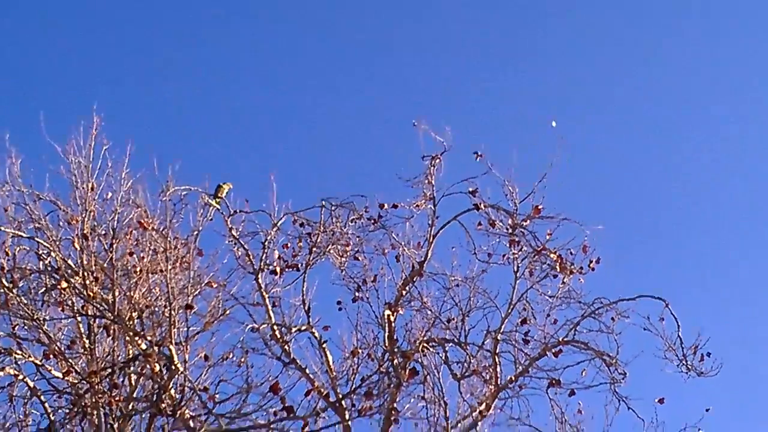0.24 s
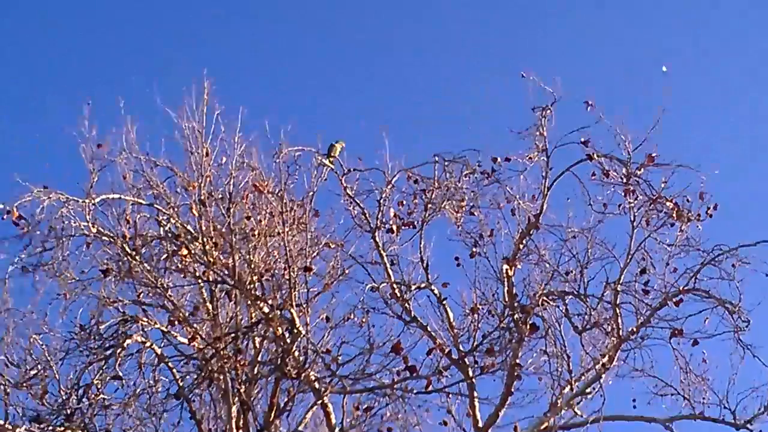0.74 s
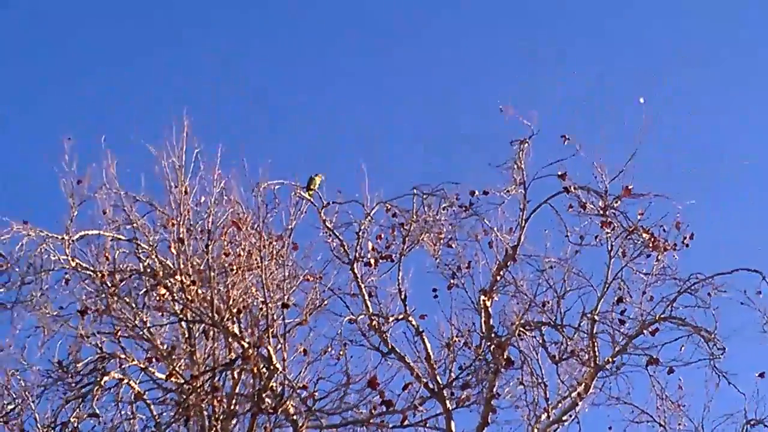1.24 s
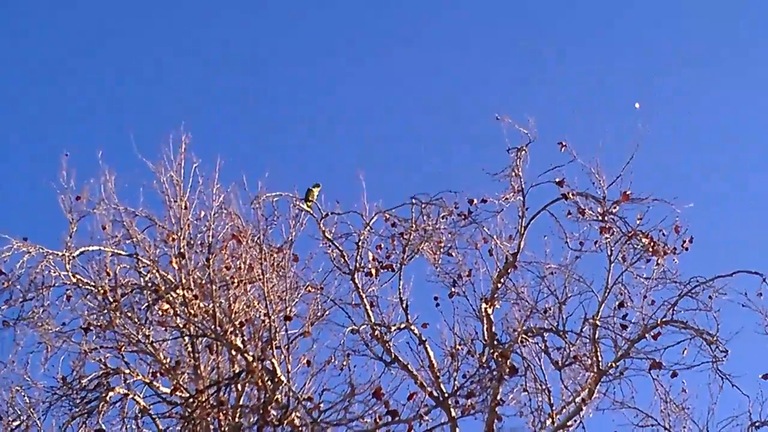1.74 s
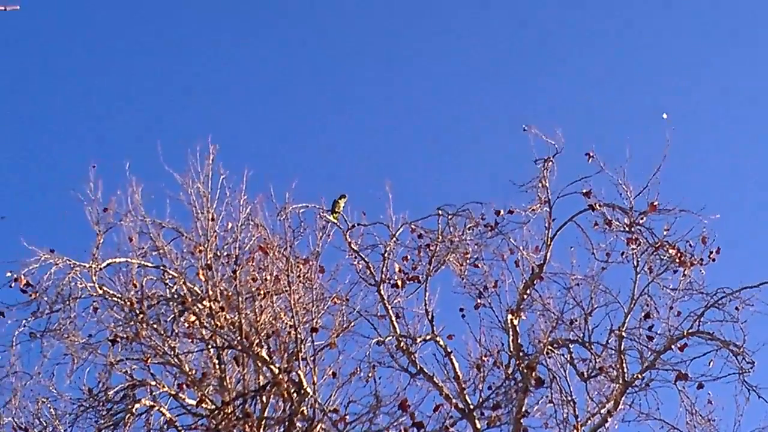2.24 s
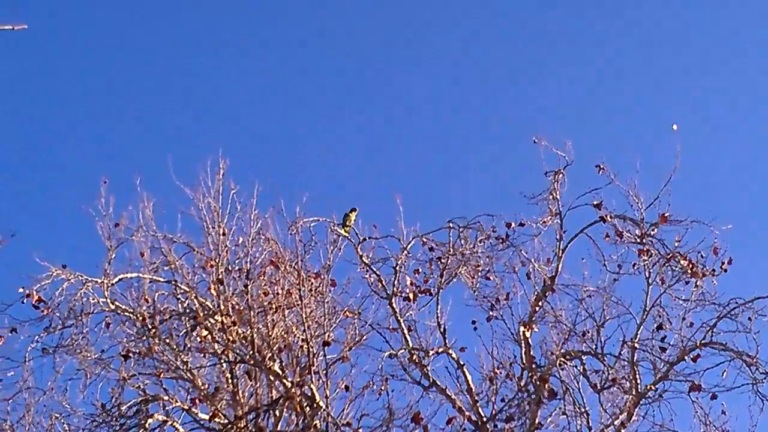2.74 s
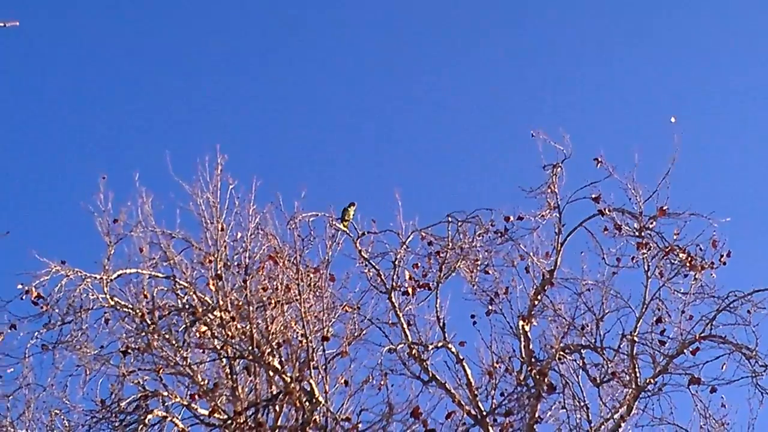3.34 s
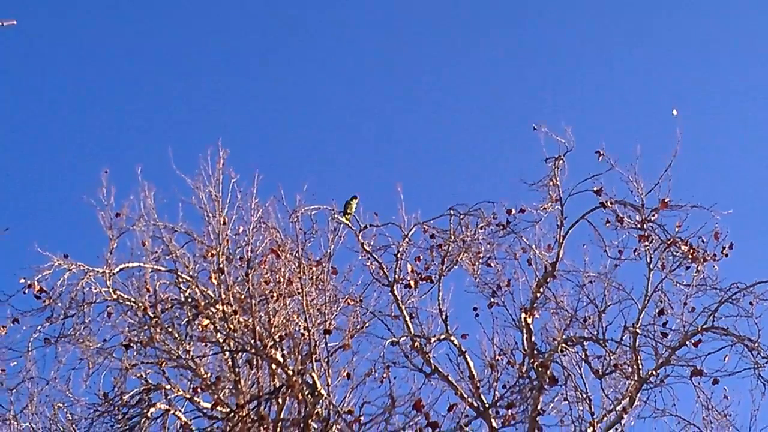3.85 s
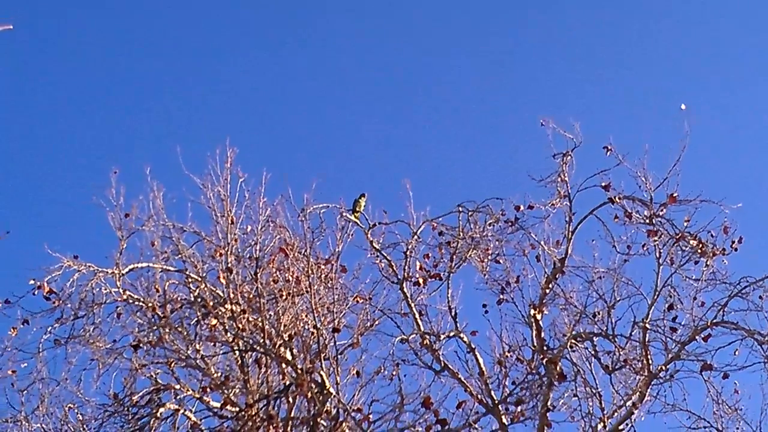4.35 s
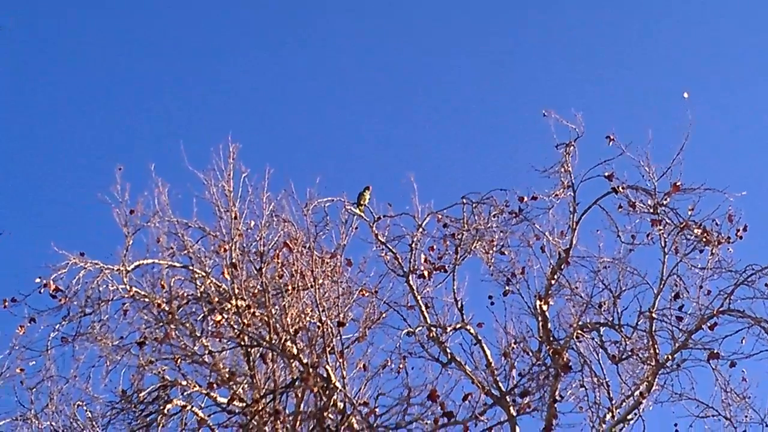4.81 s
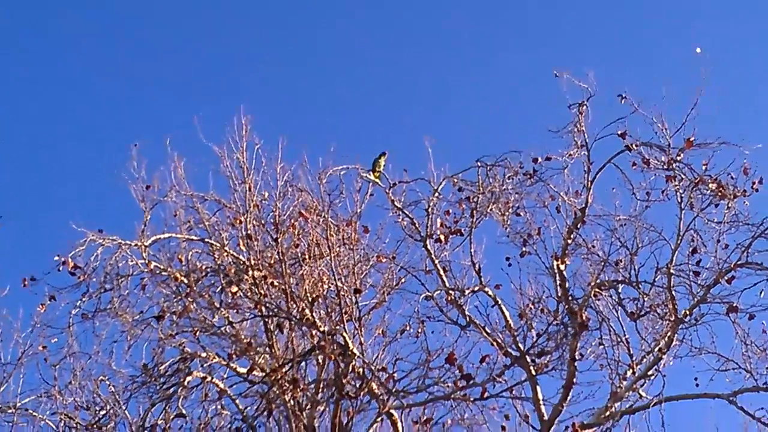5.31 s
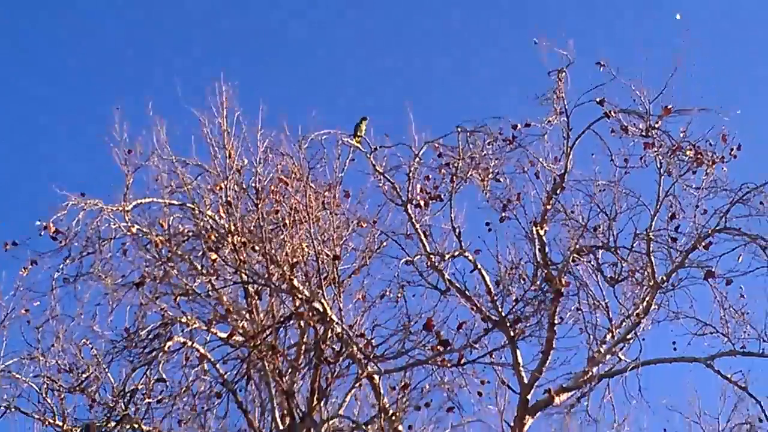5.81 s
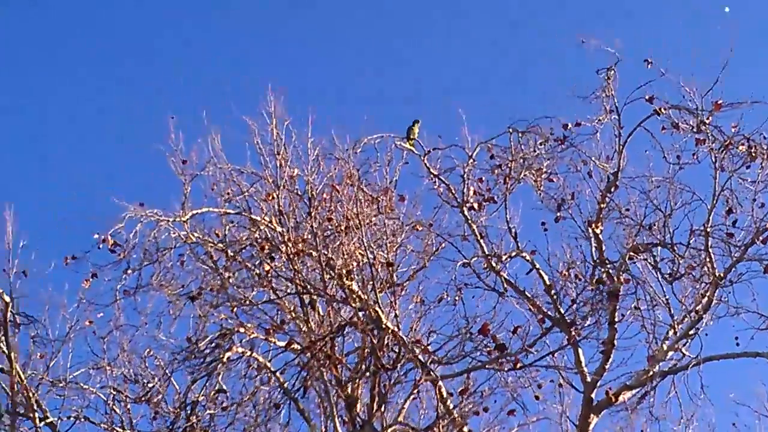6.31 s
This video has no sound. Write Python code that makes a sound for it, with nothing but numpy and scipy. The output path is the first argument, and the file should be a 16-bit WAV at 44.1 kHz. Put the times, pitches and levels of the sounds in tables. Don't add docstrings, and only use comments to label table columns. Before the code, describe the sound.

A close parrot yodels and later squawks roughly from a bare tree while sparrows chirp and warble and other parrots rasp and screech further off.

```python
import sys
import numpy as np
from scipy import signal
from scipy.io import wavfile
from scipy.ndimage import uniform_filter1d

SR = 44100
rng = np.random.default_rng(int(sys.argv[2]) if len(sys.argv) > 2 else 0)


def dump(signal):
    limited = np.clip(np.atleast_2d(signal).T, -1, 1)
    pcm = np.round(limited * 32767).astype(np.int16)
    wavfile.write(sys.argv[1], SR, pcm)


def gain_from_decibels(decibels):
    exponent = np.asarray(decibels, float) / 20
    return 10 ** exponent


N = 289737

LEAP = 1.4
NEAR_BURR = 0.42


def in_db(points, hz):
    corner_hz, level = np.array(points).T
    return np.interp(np.log(hz), np.log(corner_hz), level)


def rms_one(x):
    return x / np.sqrt(np.mean(np.abs(x) ** 2) + 1e-20)


def wobble(count, hz):
    white = rng.standard_normal(count + 200) + 1j * rng.standard_normal(count + 200)
    lowpass = signal.butter(2, min(hz, 9000), fs=SR, output="sos")
    return rms_one(signal.sosfilt(lowpass, white)[200:])


def slow_wobble(hz):
    return np.repeat(wobble(N // 64 + 1, 64 * hz).real, 64)[:N]


def add(track, start, sound):
    at = round(start * SR)
    track[at:at + len(sound)] += sound[:N - at]


def gate(birds):
    shut_db, lift_db = -60, 9
    open_from_db, open_full_db, duck_from_db = -60, -38, -23
    sense_s, lag_s = 0.033, 0.029
    power = uniform_filter1d(birds.mean(axis=0) ** 2, round(sense_s * SR))
    call_db = 10 * np.log10(np.abs(power) + 1e-12)
    call_db = np.interp(np.arange(N) - lag_s * SR, np.arange(N), call_db)
    opening = np.clip((call_db - open_from_db) / (open_full_db - open_from_db), 0, 1)
    duck_db = np.maximum(call_db - duck_from_db, 0)
    return shut_db + lift_db * opening - duck_db + slow_wobble(8.3)


def background(gate_db):
    # frequency in Hz, level in dB per Hz.
    air = [(21, -58), (35, -13), (69, -1.5), (128, -7), (156, -12.5), (343, -19), (420, -28), (555, -7),
           (614, -18), (734, -23), (1280, -27.5), (1460, -27.5), (3040, -24.5), (3910, -29.5), (15000, -41)]
    # frequency in Hz, left-right likeness from -1 to 1.
    likeness = [(60, 0.95), (180, 0.92), (550, 0.38), (1650, 0.0062), (4970, -0.17), (15000, -0.15)]
    white = rng.standard_normal((2, 2, N))
    edges = 24 * 2 ** np.arange(0, 9.6, .5)
    out = 0
    for k, (low, high) in enumerate(zip(edges, edges[1:])):
        bandpass = signal.butter(2, [low, high], "band", fs=SR, output="sos")
        mid, side = signal.sosfilt(bandpass, white[k % 2])
        hz = np.sqrt(low * high)
        alike = np.clip(in_db(likeness, hz), -1, 1)
        stereo = np.sqrt(1 + alike) * mid + np.sqrt(1 - alike) * side * [[1], [-1]]
        out = out + gain_from_decibels(in_db(air, hz) + 4.5 * slow_wobble(10.15625)) * stereo
    return gain_from_decibels(gate_db + 3.0) * rms_one(out)


def rustles():
    # start in seconds, length in seconds, level in dB.
    puffs = [
        (3.185, .04, -55),
        (3.74, .09, -58),
        (4.3, .16, -64),
        (4.66, .075, -60),
    ]
    out = np.zeros(N)
    for start, length, level_db in puffs:
        count = round(length * SR)
        add(out, start, gain_from_decibels(level_db) * rng.standard_normal(count) * np.hanning(count) ** 0.34)
    return signal.sosfilt(signal.butter(2, 7500, "high", fs=SR, output="sos"), out)


def twigs():
    # time in seconds, peak level in dB.
    ticks = [(0.1, -31), (1.296, -44), (3.79, -40), (3.976, -56), (4.649, -38), (3.371, -67.5),
             (4.112, -59.5)]
    out = np.zeros(N)
    decay = np.exp(-np.arange(150) / 20.0)
    for at, peak_db in ticks:
        add(out, at, gain_from_decibels(peak_db) * rng.standard_normal(150) * decay)
    return signal.sosfilt(signal.butter(2, [5500, 14000], "band", fs=SR, output="sos"), out)


def dove():
    # start in seconds, end in seconds, pitch in Hz, level in dB.
    coos = [
        (.85, 1.12, 535, -73),
        (1.55, 2.2, 540, -72),
        (5.98, 6.1, 560, -72),
        (6.33, 6.5, 540, -72),
    ]
    out = np.zeros(N)
    for start, end, hz, level_db in coos:
        count = round((end - start) * SR)
        waver = 1 + .8 * wobble(count, 25)
        tone = (waver * np.exp(2j * np.pi * hz * np.arange(count) / SR)).real
        add(out, start, gain_from_decibels(level_db + 3) * np.hanning(count) ** 0.054 * tone)
    return out


def whistle(pitch, envelope, burr):
    jagged = pitch * (1 + .012 * wobble(len(pitch), 52).real)
    phase = 2 * np.pi * np.cumsum(jagged) / SR
    buzz = 1 + burr * wobble(len(pitch), 310)
    tone = (buzz * np.exp(1j * phase)).real
    octave = (buzz * buzz * np.exp(2j * phase)).real
    return envelope * (tone + gain_from_decibels(-33) * octave)


def arches(notes, burr, swell):
    out = np.zeros(N)
    for start, length, from_hz, top_hz, to_hz, peak_db in notes:
        u = np.linspace(-1, 1, max(round(length * SR), 64))
        foot_hz = np.where(u < 0, from_hz, to_hz)
        pitch = top_hz - (top_hz - foot_hz) * np.abs(u) ** 3
        add(out, start, gain_from_decibels(peak_db + 4.5) * whistle(pitch, (1 - u * u) ** swell, burr))
    return out


def far_chirps():
    # start in seconds, length in seconds, top pitch in Hz, peak level in dB.
    chirps = [(0.268, 0.047, 4790, -57), (0.3, 0.055, 4810, -61), (0.352, 0.036, 4030, -62.5),
              (0.913, 0.075, 5070, -71), (0.985, 0.078, 4640, -70.5), (2.717, 0.079, 4930, -64.5),
              (2.781, 0.036, 5180, -56.5), (2.81, 0.04, 4800, -60.5), (3.428, 0.034, 5040, -60.5),
              (3.508, 0.066, 4820, -67), (4.272, 0.034, 5240, -56), (4.294, 0.012, 4380, -60.5),
              (4.319, .008, 4900, -60), (4.392, 0.013, 4300, -59), (4.337, 0.024, 5010, -53.5),
              (4.357, 0.05, 5020, -55), (4.458, 0.025, 4760, -65), (5.841, 0.042, 4690, -64.5),
              (5.878, 0.034, 4770, -63), (5.886, 0.062, 3640, -69.5), (5.934, 0.017, 3970, -63.5),
              (6.036, 0.029, 3300, -69), (6.116, 0.04, 3470, -74), (6.15, 0.028, 5100, -80),
              (6.287, 0.017, 4160, -84), (5.992, 0.022, 4740, -58), (6.015, 0.043, 4155, -54.5),
              (6.198, 0.031, 5170, -72), (6.253, 0.017, 4680, -73.5), (6.395, 0.051, 5110, -64),
              (6.538, 0.089, 5100, -60)]
    rise, drop = 0.043, 0.087
    notes = [(s, length, top * (1 - rise), top, top * (1 - drop), db) for s, length, top, db in chirps]
    return arches(notes, burr=.9, swell=1.1)


def falls():
    # start in seconds, length in seconds, start pitch in Hz, peak level in dB, pick-up level in dB.
    glides = [(0.072, 0.058, 4730, -50, -44.5), (1.204, 0.058, 4620, -48.5, -40.5),
              (2.344, .066, 4680, -50, -49.5), (3.375, .051, 4605, -47, -42),
              (4.116, 0.056, 4470, -50.5, -49.5)]
    out = np.zeros(N)
    for start, length, from_hz, peak_db, pickup_db in glides:
        u = np.linspace(0, 1, round(length * SR))
        envelope = np.minimum(u / 0.116, 1) * (1 - u ** 4.6)
        pitch = from_hz * (1 - (1 - .705) * u ** 1.6)
        add(out, start, gain_from_decibels(peak_db + 12.0) * whistle(pitch, envelope, burr=.85))
        u = np.linspace(0, 1, round(0.028 * SR))
        pickup = whistle(4700 + 600 * u, np.sin(np.pi * u), burr=1.0)
        add(out, start - .022, gain_from_decibels(pickup_db + 1) * pickup)
    return out


def slurs():
    # start in seconds, length in seconds, start pitch in Hz, end pitch in Hz, peak level in dB.
    whistles = [
        (5.416, 0.051, 4890, 4850, -25.5),
        (5.418, .026, 5360, 5280, -27),
    ]
    bow = 0.4
    notes = [(s, length, a, min(a, b) + bow * abs(b - a), b, db) for s, length, a, b, db in whistles]
    return arches(notes, NEAR_BURR, swell=.6)


def warbles():
    # time in seconds, pitch in Hz, level in dB.
    early = [
        [(.511, 3960, -55), (.516, 5270, -48), (.520, 4580, -49.5), (.526, 5540, -43), (.531, 4340, -55.5)],
        [(.534, 4230, -40), (.539, 5270, -24.5), (.547, 5600, -43), (.556, 5500, -44)],
        [(.540, 4765, -29), (.551, 4930, -24), (.565, 5440, -23), (.580, 4950, -26), (.586, 5540, -32),
         (.591, 4400, -40), (.601, 3670, -52)],
        [(.602, 3580, -43), (.608, 4470, -28), (.616, 4990, -24), (.622, 4840, -39), (.629, 4130, -29),
         (.638, 4720, -23.5), (.652, 4770, -24.5), (.661, 4260, -36.5), (.673, 3450, -50)],
    ]
    long = [
        [(3.723, 3460, -64), (3.733, 3940, -51), (3.740, 5000, -36), (3.747, 5200, -39), (3.762, 5250, -48),
         (3.770, 4620, -37), (3.778, 3580, -48)],
        [(3.780, 3730, -40), (3.793, 4950, -29.5), (3.802, 5350, -30.5), (3.812, 4980, -29),
         (3.825, 5150, -33.5), (3.834, 4735, -33), (3.844, 4400, -33), (3.860, 5230, -29), (3.869, 4140, -42)],
        [(3.815, 3290, -52), (3.824, 3775, -37), (3.831, 4620, -30), (3.836, 4800, -42)],
        [(3.846, 3740, -46), (3.853, 4030, -33), (3.860, 4770, -33)],
        [(3.870, 3950, -30), (3.876, 4230, -32), (3.885, 4920, -28.5), (3.897, 4640, -28), (3.905, 4510, -42),
         (3.911, 3860, -29.5), (3.918, 3800, -50)],
        [(3.917, 4560, -46), (3.925, 5050, -54), (3.934, 4420, -53)],
        [(3.953, 3540, -58), (3.961, 3790, -47), (3.970, 4150, -49), (3.976, 4490, -40.5), (3.981, 4270, -60)],
    ]
    late = [
        [(2.121, 4113, -35), (2.130, 4950, -22), (2.136, 5290, -26.5), (2.142, 4800, -31), (2.147, 4300, -42)],
        [(2.146, 3760, -31), (2.155, 4570, -21.5), (2.163, 4424, -29), (2.170, 4840, -31), (2.176, 4256, -29.5),
         (2.186, 3420, -33)],
        [(4.640, 3680, -51), (4.647, 4400, -35), (4.655, 5330, -31), (4.664, 5150, -35), (4.676, 5200, -32),
         (4.683, 5540, -26.5), (4.688, 4200, -34), (4.695, 3500, -51)],
        [(4.710, 4120, -44), (4.716, 4890, -26.5), (4.721, 5050, -28), (4.728, 4530, -23.5), (4.736, 4400, -33)],
        [(4.729, 3800, -36), (4.737, 4920, -18.5), (4.745, 5210, -23.5), (4.754, 4830, -21), (4.760, 4670, -25),
         (4.769, 3560, -48)],
        [(5.528, 4640, -31), (5.535, 5200, -27), (5.543, 4360, -24.5)],
        [(5.549, 4390, -20.5), (5.556, 4980, -20.5), (5.566, 5050, -22), (5.576, 4840, -26), (5.583, 4340, -28),
         (5.587, 4120, -45.5)],
    ]
    # delay in seconds, level in dB.
    echoes = [
        (.019, -17),
        (.043, -22),
        (.126, -29),
    ]
    out = np.zeros(N)
    smooth = round(.002 * SR)
    for syllable in early + long + late:
        s, hz, db = np.transpose(syllable)
        t = np.arange(s[0], max(s[-1], s[0] + .004), 1 / SR)
        pitch = uniform_filter1d(np.interp(t, s, hz), smooth)
        level_db = uniform_filter1d(np.interp(t, s, db), smooth)
        depth = .3 * np.abs(wobble(len(t), 25))
        trill_hz = 300 * rng.uniform(.7, 1.4)
        flutter = 1 + depth * np.cos(2 * np.pi * trill_hz * t)
        envelope = gain_from_decibels(level_db) * flutter * np.hanning(len(t)) ** .1
        add(out, s[0], whistle(pitch, envelope, NEAR_BURR))
    heard = out.copy()
    for delay, level_db in echoes:
        add(heard, delay, gain_from_decibels(level_db) * out)
    return heard


def phrase(rows, leap):
    notes = []
    for (start, hz, db, rough), (end, next_hz, *_) in zip(rows, rows[1:]):
        glides = max(hz / next_hz, next_hz / hz) < leap
        notes.append((start, end, hz, next_hz if glides else hz, db, rough))
    return notes


def parrot(notes, throat, edge_s, spread, swell, jitter, blur, half):
    out, last_end = np.zeros(N), 0
    for start, end, from_hz, to_hz, level_db, rough in notes:
        rough = np.clip(rough, 0, 1)
        count = max(round((end - start + edge_s) * SR), 64)
        pitch = np.linspace(from_hz, to_hz, count)
        turns = np.cumsum(pitch * (1 + jitter * rough * wobble(count, 150).real)) / SR
        note = 0
        for k in np.arange(1, 15800 / min(from_hz, to_hz), .5):
            gain = gain_from_decibels(in_db(throat, k * pitch)) * (k * pitch < 15900)
            if k % 1:
                gain = gain * half * rough
            noisy = k * from_hz > 6500
            if noisy:
                gain = gain * gain_from_decibels(0.96 * min(level_db + 27, 0))
            if k == 3 and from_hz > 1345:
                gain = gain * gain_from_decibels(-8)
            clear = (1 - rough) ** (k ** spread) * (.15 if noisy else 1)
            smear_hz = (.45 if noisy else blur) * from_hz
            smear = np.sqrt(clear) + np.sqrt(1 - clear) * wobble(count, smear_hz)
            note = note + gain * (smear * np.exp(2j * np.pi * (k * turns + rng.random()))).real
        steps = np.arange(count)
        ramp = np.minimum(np.minimum(steps, steps[::-1]) / (edge_s * SR), 1)
        if abs(start - last_end) > .015:
            ramp = ramp * np.linspace(0, 1, count) ** swell
        add(out, start - edge_s / 2, gain_from_decibels(level_db) * rms_one(note) * ramp)
        last_end = end
    return out


def cries():
    # start in seconds, length in seconds, pitch in Hz, level in dB.
    calls = [(0.119, 0.044, 2997, -50), (2.249, 0.174, 2423, -54.5), (3.399, 0.059, 3060, -54.5),
             (4.086, .06, 1695, -45.5), (4.161, 0.062, 3290, -53.5), (4.393, 0.28, 2557, -59.5),
             (5.505, .2, 2710, -50), (5.518, 0.13, 3645, -43.5), (4.607, 0.14, 2600, -44)]
    notes = []
    for start, length, hz, db in calls:
        sag = 0.29 * np.exp(-(length / 0.055) ** 2)
        notes.append((start, start + length, hz, hz * (1 - sag), db, .2))
    return notes


def far_screech():
    # start in seconds, pitch in Hz, level in dB, roughness 0-1.
    low = [(2.91, 2645, -48, 0.5), (2.96, 2770, -47, 0.36), (3.06, 2709, -38.5, 0.67),
           (3.17, 2524, -37.5, 0.5), (3.22, 2292, -40, 0.32), (3.30, 2249, -45, .3)]
    high = [(2.94, 5000, -37.5, 0.7), (3.04, 4802, -40.5, 0.57), (3.17, 4763, -47.5, .5),
            (3.22, 4680, -49, 0.13), (3.30, 4516, -44, .4)]
    # frequency in Hz, level in dB.
    throat = [(710, -54), (1200, -20), (1920, -9), (2200, 0), (2750, -1), (3180, -6.5), (4760, 3.5),
              (5880, -13), (8650, -19.5), (12000, -23.5), (15600, -73), (22000, -120)]
    notes = phrase(low, LEAP) + phrase(high, LEAP) + cries()
    return parrot(notes, throat, edge_s=.02, spread=2.2, swell=1.3, jitter=.1, blur=.11, half=.9)


def rasp():
    # start in seconds, level in dB.
    calls = [
        [(1.05, -46), (1.13, -42), (1.22, -46.5), (1.32, -49)],
        [(4.69, -24.5), (4.77, -30), (4.83, -25.5), (4.91, -39), (5.01, -44)],
    ]
    # frequency in Hz, level in dB.
    throat = [(590, -44), (1000, -23), (1320, -25.5), (1790, -9), (2070, -14), (3670, 5.5), (5800, -7.5),
              (6630, -10), (8880, -25.5), (9650, -27.5), (12000, -35.5), (15600, -84), (22000, -120)]
    notes = []
    for call in calls:
        notes += phrase([(start, 923, db, 1) for start, db in call], LEAP)
    return parrot(notes, throat, edge_s=.019, spread=.57, swell=.53, jitter=.065, blur=.12, half=.85)


def yodel():
    # start in seconds, pitch in Hz, level in dB, roughness 0-1.
    dip = [(1.810, 1120, -40.5, 0.76), (1.827, 1048, -30, 0.07), (1.849, 768, -24.5, 0.2),
           (1.865, 1214, -28.5, .2)]
    breaks = [(1.864, 2476, -24, 0.0067), (1.872, 2337, -20.5, 0.011), (1.909, 2333, -25.5, 0.011),
              (1.912, 1252, -24.5, 1.1), (1.917, 2210, -24.5, 0.17), (1.924, 1540, -23, 0.079),
              (1.941, 2427, -26, .1), (1.950, 850.4, -21, 0.18), (1.975, 2300, -18, 0.041),
              (1.981, 1570, -21, 0.037), (2.005, 2550, -16, .02), (2.012, 2410, -16, 0.011),
              (2.039, 1556, -21.5, .04), (2.063, 2271, -23.5, 0.18), (2.070, 891.7, -20, 0.059),
              (2.104, 859.4, -35, 0.14), (2.130, 860, -39.5, 0.12), (2.19, 848, -40, .2)]
    # frequency in Hz, level in dB.
    throat = [(350, -57), (600, -38), (1170, -18), (1520, -16.5), (1970, -14), (2420, -5.5), (2740, -25.5),
              (3190, -17), (3750, -19), (4870, -7), (6320, -19), (7050, -25), (11200, -40), (15800, -32.5)]
    notes = phrase(dip, 2) + phrase(breaks, LEAP)
    return parrot(notes, throat, edge_s=.003, spread=1.6, swell=.15, jitter=.05, blur=.2, half=.85)


def squawk():
    # start in seconds, pitch in Hz, level in dB, roughness 0-1.
    growl = [(5.203, 587.5, -29, .2), (5.245, 649, -27.5, 0.17), (5.266, 727.5, -24, 0.28),
             (5.285, 701.2, -20.5, .48), (5.320, 720.7, -19, .48), (5.352, 730.3, -20, 0.26),
             (5.368, 644, -18.5, .25), (5.396, 658, -16.5, .4), (5.422, 1380, -18, 0.17),
             (5.462, 1315, -15.5, 0.2), (5.499, 1156, -33, .3)]
    # frequency in Hz, level in dB.
    throat = [(290, -73), (500, -57.5), (680, -35.5), (1020, -16.5), (1390, -10.5), (1660, -7.5), (2120, 0),
              (2700, -11.5), (3200, -17.5), (3890, -1), (5120, -3), (5920, -10), (7100, -22), (8700, -35),
              (10800, -26), (11800, -37.5), (14300, -18.5), (15800, -32)]
    return parrot(phrase(growl, 3), throat, edge_s=.006, spread=.85, swell=1.6, jitter=.08, blur=.14, half=1.2)


def place(x, pan_db, lag, shadow_hz, wet_db, t60, wet_pan_db):
    t = np.arange(SR // 2 + 4000) / SR
    scatter = rng.standard_normal((2, len(t))) * gain_from_decibels(-60 * t / t60) * np.minimum(t / 0.0042, 1)
    scatter = signal.sosfilt(signal.butter(1, 7000, fs=SR, output="sos"), scatter)
    scatter = scatter / np.linalg.norm(scatter, axis=1, keepdims=True)
    wet = signal.fftconvolve(x[None], scatter, axes=1)[:, :N]
    shade = signal.butter(4, shadow_hz, fs=SR, output="sos")
    wet[1] = signal.sosfilt(shade, wet[1])
    left = np.interp(np.arange(N) - lag, np.arange(N), x)
    right = signal.sosfilt(shade, x)
    sides = np.array([[.5], [-.5]])
    return np.array([left, right]) * gain_from_decibels(pan_db * sides) + gain_from_decibels(wet_db + wet_pan_db * sides) * wet


def scene():
    near = slurs() + warbles() + falls() + twigs() + rustles()
    far = far_chirps() + dove()
    birds = place(far, pan_db=16, lag=-3, shadow_hz=15000, wet_db=-5, t60=.24, wet_pan_db=1.5)
    birds += place(near, pan_db=12, lag=-10, shadow_hz=12700, wet_db=-11, t60=.26, wet_pan_db=6)
    birds += place(far_screech(), pan_db=-3, lag=-13, shadow_hz=15000, wet_db=-5, t60=.4, wet_pan_db=-1)
    birds += place(rasp(), pan_db=4.5, lag=5.73, shadow_hz=17400, wet_db=-11.5, t60=.29, wet_pan_db=-1.5)
    birds += place(yodel(), pan_db=4.5, lag=-.37, shadow_hz=9100, wet_db=-11.5, t60=.42, wet_pan_db=-.5)
    birds += place(squawk(), pan_db=4.5, lag=-.7, shadow_hz=9500, wet_db=-9, t60=.38, wet_pan_db=4.5)
    return birds + background(gate(birds))


def mute_faint_bands(x, depth_db, spread_db):
    hz, _, frames = signal.stft(x, SR, nperseg=2048)
    band = np.round(11 * np.log2(1 + hz / 900)).astype(int)
    starts = np.flatnonzero(np.diff(band, prepend=-1))
    widths = np.diff(starts, append=len(hz))
    power = np.add.reduceat(np.abs(frames) ** 2, starts, axis=1) / widths[:, None]
    loudest = power[:, hz[starts] > 1000].max(axis=1, keepdims=True)
    depth_db = depth_db + 1.1 * np.log2(np.maximum(hz[starts], 300) / 4000)[:, None]
    limit = loudest * gain_from_decibels(spread_db * rng.standard_normal(power.shape) - depth_db) ** 2
    keep = np.repeat(power > limit, widths, axis=1)
    keep = keep | (hz < 200)[:, None]
    return signal.istft(frames * keep, SR, nperseg=2048)[1][:, :N]


def top_cut(x):
    return signal.sosfilt(signal.butter(12, 15800, fs=SR, output="sos"), x)


def record(dry):
    mix = signal.sosfilt(signal.butter(3, 44, "high", fs=SR, output="sos"), dry)
    mix = mute_faint_bands(mix, depth_db=35.5, spread_db=5.0)
    return top_cut(mix)


dry = scene()
out = record(dry)
dump(out)
```